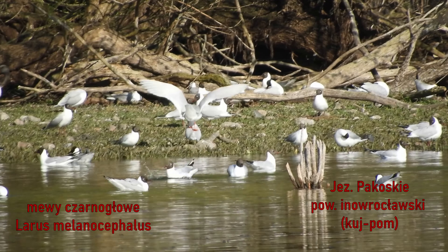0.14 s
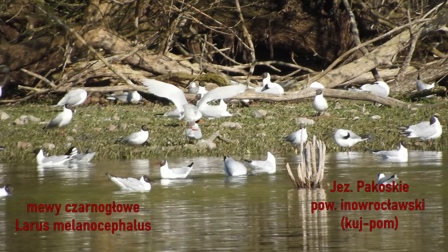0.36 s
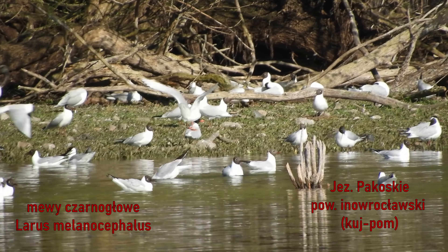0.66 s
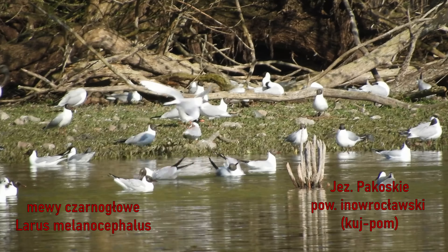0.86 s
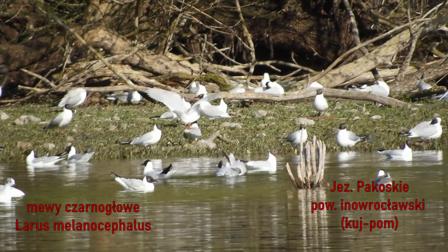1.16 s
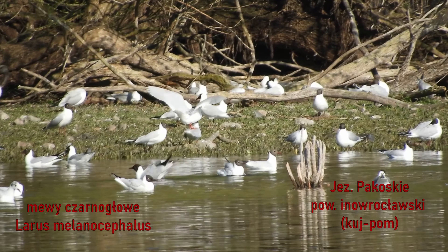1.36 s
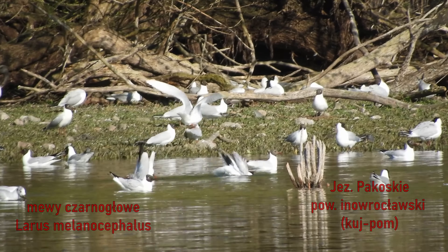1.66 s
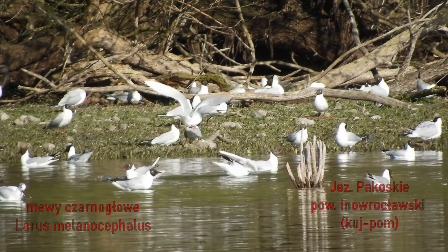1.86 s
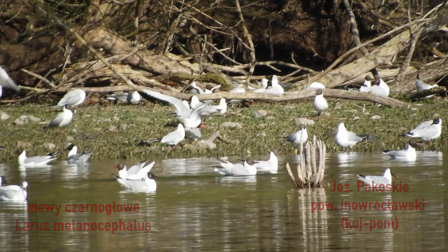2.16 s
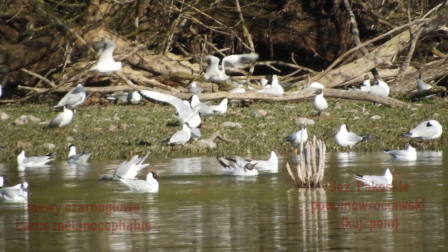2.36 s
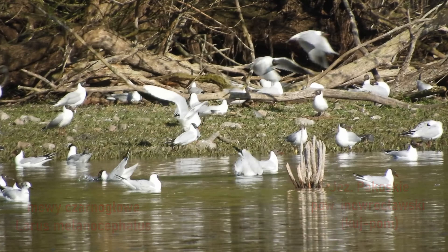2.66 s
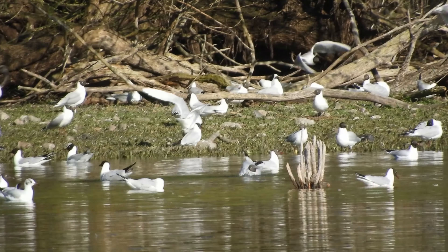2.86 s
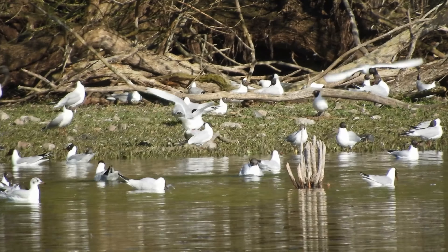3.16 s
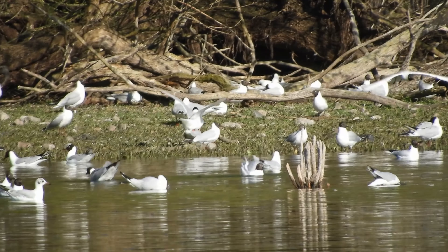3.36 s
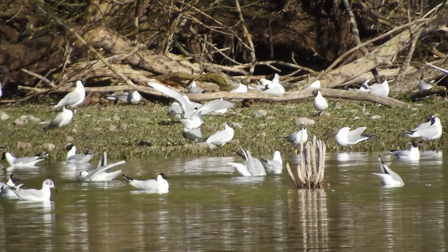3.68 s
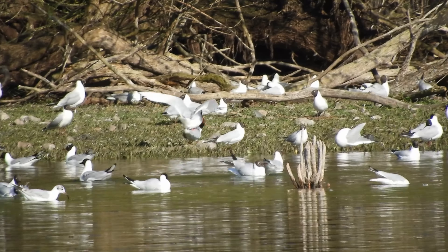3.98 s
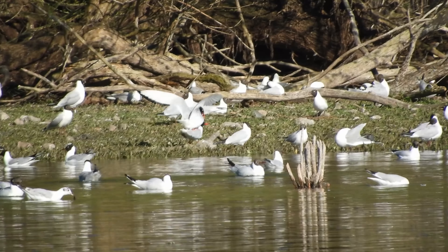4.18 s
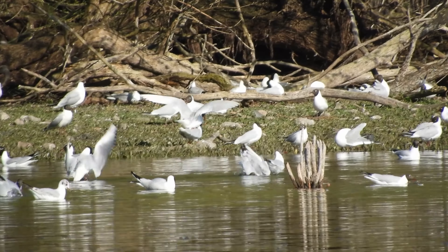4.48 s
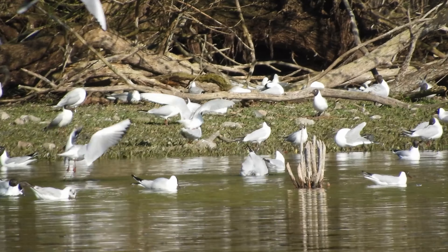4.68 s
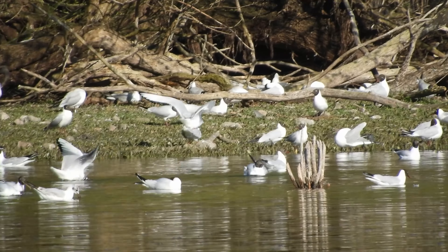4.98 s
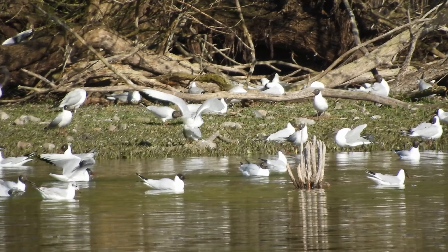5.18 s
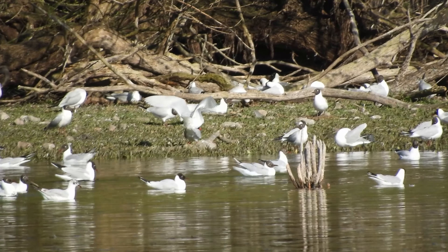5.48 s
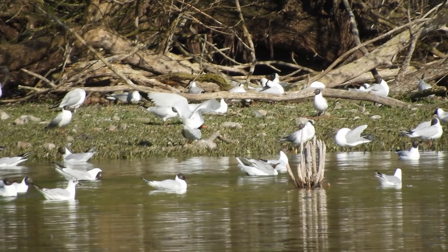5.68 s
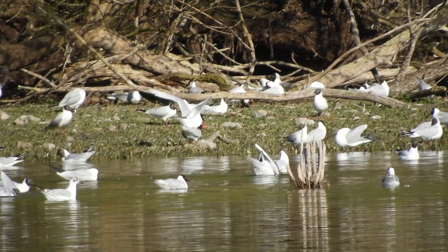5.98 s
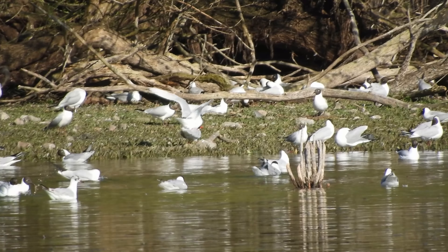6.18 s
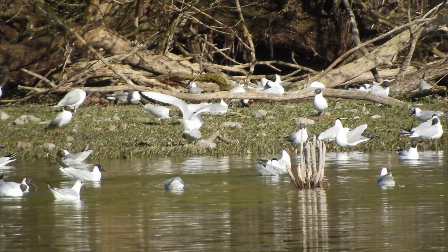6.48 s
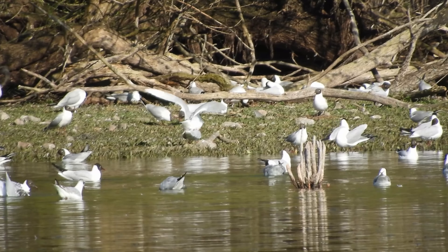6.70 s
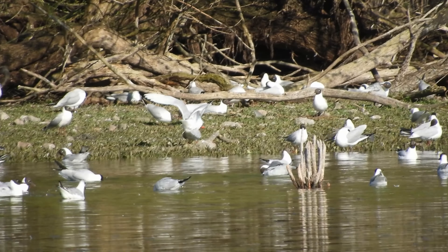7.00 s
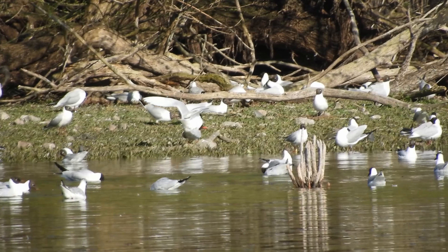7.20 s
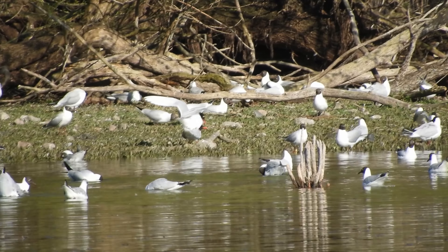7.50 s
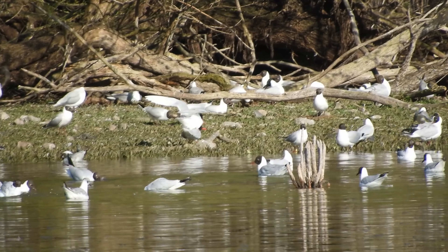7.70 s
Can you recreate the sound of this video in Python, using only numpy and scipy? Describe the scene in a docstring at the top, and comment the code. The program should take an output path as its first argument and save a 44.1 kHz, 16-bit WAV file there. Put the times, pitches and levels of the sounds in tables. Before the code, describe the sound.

Hundreds of gulls cry at once across open water, blurring into a steady nasal clamour with a loud midrange and softened highs. Individual cries, about a fifth of a second long, scoop up then sag, some clean, others hoarse. Brief high chips and three thin pips are nearly buried. A faint low hum appears only at the start, over light rumble and hiss. Sound is on the left side only, with a soft woodland echo.

```python
"""A lake shore with a gull colony, heard across the water on the left channel only; the right is silent.
Hundreds of arching pulse-train cries and a noise wash make the chorus, in three registers that swell.
Harmonic cries of nearer gulls stand out, and noise tails give the echo of the wood behind.
Gliding sines make a songbird's chips and a waterbird's pips; wavering sines make a faint drone and
a low hum that stops early, over a distant rumble and hiss of filtered noise."""
import sys
import numpy as np
from scipy import signal
from scipy.fft import rfft, irfft, next_fast_len
from scipy.io import wavfile
from scipy.ndimage import uniform_filter1d

SR = 44100
rng = np.random.default_rng(int(sys.argv[2]) if len(sys.argv) > 2 else 0)


def file_out(sig):
    """Save sig as 16-bit WAV at sys.argv[1]."""
    # one column per channel
    cols = np.atleast_2d(sig).T
    # limit, then scale
    lim = np.clip(cols, -1, 1)
    pcm = np.round(lim * 32767).astype(np.int16)
    wavfile.write(sys.argv[1], SR, pcm)


N = 346185
TIME = np.arange(N) / SR

# Levels below are those ahead of the preamp; levels of cries, chips and pips are also ahead of their fades.
# Swell of the far chorus's screaming, of which only the departures from the mean count: [t/s, level/dB]
SCREAMING_SWELL = [(0.0, -35.5), (0.13, -35.5), (0.83, -36.5), (0.85, -37.5), (1.9, -34), (3.06, -36),
                   (3.32, -30.5), (3.59, -40.5), (3.78, -34), (4.81, -35), (5.46, -38), (5.77, -33.5),
                   (6.41, -37.5), (6.58, -32.5), (7.04, -36.5), (7.85, -34)]
# Extra level of the chorus's harsh overtones: [t/s, level/dB]
OVERTONE_LIFT = [(0, 0.5), (1.5, -1.7), (2.6, -2), (3.3, 0.5), (4.2, 0), (5.0, 4), (5.9, 2), (6.15, -1),
                 (6.6, 2), (7.85, -0.1)]
# Borders between the chorus registers: [lower f/Hz, upper f/Hz]
REGISTER_BORDERS = (1350, 2600)
# Chorus registers, in rows: low mewing, open-beaked screaming, harsh overtones
# [mean level/dB, share of the screaming's swell followed, own slow drift/dB]
CHORUS_REGISTERS = [(-41, 0.34, 1), (-37, .9, 0.76), (-58, .6, .3)]
DRIFT_HZ = 2.8
# Tone colour of the gulls' voice after its way over the water: [f/Hz, gain/dB]
VOICE_OVER_WATER = [(300, -45.5), (420, -29.5), (540, -13.5), (680, -8), (1000, -4.5), (1400, -1),
                    (1800, 2.5), (2050, -1.5), (2500, -14.5), (3000, -26.5), (4000, -32.5), (4700, -40),
                    (5500, -43.5), (7000, -57)]

# Nearer gulls, one row a cry or a strong overtone of one; f is that of the row's loudest harmonic at the crest
# [start t/s, length t/s, crest f/Hz, level/dB, rasp 0-1]
NEAR_VOICES = [(0.073, 0.22, 2170, -39.5, .25), (0.075, 0.2, 3230, -57.5, 0.5),
               (0.247, 0.21, 1790, -39, 0.19), (0.421, .16, 2240, -44.5, 0.4),
               (0.579, 0.2, 2102, -40, 0.37), (0.728, 0.2, 1680, -40.5, 0.34),
               (0.777, 0.23, 3800, -60.5, .4), (1.692, 0.055, 2320, -43, .9),
               (1.838, .055, 2330, -45.5, .9), (1.861, 0.26, 1798, -41.5, 0.17),
               (1.862, 0.21, 3820, -62, 0.6), (2.238, 0.21, 1833, -42, 0.18), (2.72, 0.22, 1173, -40, 0.4),
               (2.806, 0.2, 3860, -60.5, 0.47), (2.919, .26, 2102, -41, 0.43), (3.22, 0.23, 1822, -37, 0.6),
               (3.489, 0.18, 1628, -45, 0.17), (3.72, 0.21, 2033, -36, 0.44), (3.77, 0.037, 3170, -50, 0.3),
               (3.815, 0.18, 2550, -49, 0.4), (3.801, 0.14, 3770, -62.5, .4),
               (4.142, 0.11, 1898, -33.5, 0.15), (4.448, 0.16, 2133, -37, 0.79),
               (4.66, 0.19, 2106, -39, 0.3), (5.11, 0.23, 2273, -44, 0.3), (5.31, 0.16, 3020, -52, 0.72),
               (5.621, 0.2, 1090, -43, 0), (5.83, 0.1, 994, -38, 0.15), (6.017, 0.051, 1035, -38.5, 0),
               (6.12, 0.16, 1842, -42.5, 0.05), (6.297, 0.22, 4150, -60.5, .6),
               (6.519, 0.24, 1992, -39.5, 0.68), (6.667, .15, 3090, -56, 0.63),
               (6.76, 0.17, 1873, -42.5, 0.3), (7.154, 0.21, 3840, -61, 0.54),
               (7.212, 0.18, 2640, -51.5, .2), (7.562, 0.2, 3200, -52.5, 0.67)]
# Every row scoops up to a crest and sags; the longer it lasts, the wider the arch
CREST_SHARE = .4  # of the length
SCOOP_OCTAVES_PER_S, SAG_OCTAVES_PER_S = 1.7, 1.25  # average slopes

# Songbird chips, swept up or down: [start t/s, length t/s, start f/Hz, end f/Hz, level/dB]
SONGBIRD_CHIPS = [(2.654, .05, 5550, 7500, -64.5), (2.89, .045, 5300, 6250, -70),
                  (3.65, .024, 5100, 6700, -60), (4.058, .019, 6240, 5400, -66),
                  (4.691, .034, 6300, 5150, -59), (5.06, .056, 6550, 5480, -55)]
# A rising chip sweeps evenly, a falling one levels off: share of the sweep above its low note at half time
CHIP_RISING_MIDWAY, CHIP_FALLING_MIDWAY = .5, .15
# Waterbird pips, all the same rising note: [start t/s, level/dB]
WATERBIRD_PIPS = [(3.51, -53.5), (4.24, -53.5), (4.945, -50.5)]
# Glide of a pip: [start f/Hz, middle f/Hz, end f/Hz]
PIP_GLIDE = (3270, 3550, 3560)
PIP_S = .065

# Low hum in three spells: [start t/s, length t/s, level/dB]
HUM_SPELLS = [(-.05, 0.63, -59), (.67, 0.16, -56.5), (1.04, 0.19, -55.5)]
HUM_HZ, HUM_FADE_S = 69.7, .06
# Partials of the faint drone: [f/Hz, level/dB]
DRONE_PARTIALS = [(73, -75), (97, -68), (146, -71)]
# Tone colour of the distant rumble and even hiss: [f/Hz, gain/dB]
RUMBLE_AND_HISS = [(20, -10), (45, -1), (95, -1), (150, -4), (220, -8), (380, -9.5), (1000, -16),
                   (4000, -29.5), (8000, -34), (15500, -34.5)]
RUMBLE_AND_HISS_DB = -59.5  # rms

TOP_HZ = 15750  # upper limit of the sound


def chorus(wash_db=-6, wash_corner_hz=1300, count=2):
    """Far flocks, each with its own echo, and a wash of noise; three registers swell by their own shares."""
    flocks = sum(wood(far_gulls(), t60_s=.63, wet_db=-5) for _ in range(count))
    # the farthest birds merge into a wash, of which mostly the low register carries
    wash = shape(rng.standard_normal(N), lambda f: 1 / np.hypot(1, f / wash_corner_hz))
    crowd = level(flocks, 0) + level(wash, wash_db)

    below_lower, below_upper = (shape(crowd, lambda f: 1 / (1 + (f / hz) ** 20)) for hz in REGISTER_BORDERS)
    registers = (below_lower, below_upper - below_lower, crowd - below_upper)

    screaming = np.interp(TIME, *np.transpose(SCREAMING_SWELL))
    surge = screaming - screaming.mean()
    lifts = (0, 0, np.interp(TIME, *np.transpose(OVERTONE_LIFT)))
    out = np.zeros(N)
    for register, (mean_db, follows, drift_db), lift in zip(registers, CHORUS_REGISTERS, lifts):
        part = colour(register, VOICE_OVER_WATER)
        # even out the quarter-second loudness, then ride the level
        strength = np.sqrt(uniform_filter1d(part ** 2, size=SR // 4))
        ride_db = mean_db + follows * surge + lift + drift_db * wander(DRIFT_HZ)
        out += part / strength * undb(ride_db)
    return out


def far_gulls(count=260, low_hz=430, high_hz=950, shortest_s=.1, longest_s=.34, bend=.22,
              jitter=.0503, flutter=.49, spread_db=6):
    """Cries at random times: trains of syrinx pulses, each with its own pitch arch, rasp and distance."""
    out, shake, throb = np.zeros(N), wander(124), wander(130)
    for i, (when, size, span, crest, rasp, far, place, lean) in enumerate(rng.random((count, 8))):
        length = shortest_s + span * (longest_s - shortest_s)
        top = low_hz * (high_hz / low_hz) ** size
        unsteady, beat = excerpt(shake, place, length), excerpt(throb, place, length)
        u = np.linspace(0, 1, len(beat))
        pitch = arch(u, .2 + .35 * crest, top * (1 - bend * lean), top, top * (1 - bend))
        half_phase = np.pi * np.cumsum(pitch * (1 + jitter * rasp * unsteady)) / SR
        pulses = np.sin(23 * half_phase) / np.sin(half_phase) - 1  # eleven equal harmonics
        loudness = (1 + np.tanh(flutter * rasp * beat)) * swell(u, .19) * undb(-spread_db * far)
        # one cry in each equal slot of time, at a random moment within it
        start = (i + when) / count * (N / SR + longest_s) - longest_s
        add(out, start, pulses * loudness)
    return out


def near_gulls():
    """The birds that stand out of the chorus: cries and strong overtones, all arched by the same rule."""
    start, length, top, db, rasp = np.transpose(NEAR_VOICES)
    rise = CREST_SHARE * length
    first = top * 2 ** (-SCOOP_OCTAVES_PER_S * rise)
    last = top * 2 ** (-SAG_OCTAVES_PER_S * (length - rise))
    rows = np.transpose([start, rise, length, first, top, last, db, rasp])
    return cries(rows, jitter=.034, flutter=1.2, above_db=-18.5, below_db=-14, harsh_db=7, edge=.25)


def bank_gulls(count=130, low_hz=900, high_hz=5700, shortest_s=.11, longest_s=.24, bend=.15,
               loud_db=-40, spread_db=4):
    """Birds further along the bank cry at random; pitch sets how much of the lifted harmonic arrives."""
    when, size, span, crest, rasp, far, lean = rng.random((count, 7)).T
    start = (np.arange(count) + when) / count * N / SR - longest_s / 2
    length = shortest_s + span * (longest_s - shortest_s)
    rise = length * (.1964 + .323 * crest)
    top = low_hz * (high_hz / low_hz) ** size
    dullness = .78  # share of the far chorus's tone colour
    db = loud_db + dullness * np.interp(top, *np.transpose(VOICE_OVER_WATER)) - spread_db * far
    first, last = top * (1 - bend * lean), top * (1 - bend)
    rows = np.transpose([start, rise, length, first, top, last, db, .5 * rasp])
    return cries(rows, jitter=.0427, flutter=1, above_db=-15.5, below_db=-14.5, harsh_db=8, edge=.38)


def cries(rows, jitter, flutter, above_db, below_db, harsh_db, edge, quaver=.0054,
          beak_hz=5400, beak_width_hz=600, beak_db=6):
    """Harmonic voices; the throat lifts one harmonic, and rasp shakes both pitch and loudness."""
    typical_pitch_hz = 580  # decides which harmonic is the lifted one
    out, shake, throb, wobble = np.zeros(N), wander(126), wander(200), wander(23.3)
    k = np.arange(1, 13)[:, None]  # harmonic numbers
    for (start, rise, length, first, top, last, db, rasp), place in zip(rows, rng.random(len(rows))):
        unsteady, beat, slow = (excerpt(chance, place, length) for chance in (shake, throb, wobble))
        u = np.linspace(0, 1, len(beat))
        loudest = round(top / typical_pitch_hz)
        pitch = arch(u, rise / length, first, top, last) / loudest
        hoarse = np.hypot(rasp, .3)  # no gull's voice is quite clean
        phase = 2 * np.pi * np.cumsum(pitch * (1 + jitter * hoarse * unsteady + quaver * slow)) / SR
        # harsh voices keep more of their upper harmonics, and the open beak rings high up
        slope_db = np.where(k > loudest, above_db + harsh_db * rasp, below_db)
        throat = slope_db * np.abs(k - loudest) ** .65
        beak = beak_db * np.exp(-((k * top / loudest - beak_hz) / beak_width_hz) ** 2)
        harmonics = (undb(throat + beak) * np.sin(k * phase)).sum(axis=0)
        voice = harmonics * (1 + np.tanh(flutter * hoarse * beat))
        add(out, start, level(voice, db) * swell(u, edge))
    return out


def arch(u, crest, first_hz, top_hz, last_hz):
    """Pitch of a cry: it climbs to a rounded crest and sinks as the pressure fades."""
    crest = np.clip(crest, .05, .95)
    rise = np.maximum(1 - u / crest, 0)
    fall = np.maximum((u - crest) / (1 - crest), 0)
    return top_hz + (first_hz - top_hz) * rise ** 2 + (last_hz - top_hz) * fall * np.sqrt(fall)


def songbird():
    """Short chips, each a fast sweep of a nearly pure tone."""
    notes = []
    for start, length, first, last, db in SONGBIRD_CHIPS:
        midway = CHIP_RISING_MIDWAY if last > first else CHIP_FALLING_MIDWAY
        middle = min(first, last) + midway * abs(last - first)
        notes.append((start, length, first, middle, last, db))
    return glides(notes)


def waterbird():
    """Piped notes, nearly pure, that rise and then level off."""
    return glides([(start, PIP_S, *PIP_GLIDE, db) for start, db in WATERBIRD_PIPS])


def glides(notes, waver=.011, edge=.4):
    """Sines whose pitch follows a parabola through three notes, with a fast waver."""
    out, shake = np.zeros(N), wander(250)
    for start, length, first, middle, last, db in notes:
        unsteady = excerpt(shake, start * SR / N, length)
        u = np.linspace(0, 1, len(unsteady))
        parabola = np.polyfit([0, .5, 1], [first, middle, last], 2)
        hz = np.polyval(parabola, u) * (1 + waver * unsteady)
        tone = np.sin(2 * np.pi * np.cumsum(hz) / SR)
        add(out, start, level(tone, db) * swell(u, edge))
    return out


def wood(x, t60_s, wet_db, buildup_s=.046):
    """Trunks and bank scatter a diffuse, fading echo: noise that builds up and decays."""
    t = TIME[:2 * SR]
    decay = np.exp(-np.log(1000) * t / t60_s)
    tail = rng.standard_normal(len(t)) * decay * np.minimum(t / buildup_s, 1)
    return x + undb(wet_db) * signal.fftconvolve(x, tail / np.linalg.norm(tail))[:N]


def hum():
    """A wavering low tone that sounds in faded spells and then stops."""
    spells = sum(undb(db) * swell((TIME - start) / length, HUM_FADE_S / length)
                 for start, length, db in HUM_SPELLS)
    return low_tone(HUM_HZ) * spells


def drone():
    """Faint low tones that never stop, each drifting in pitch and level."""
    return sum(low_tone(hz) * undb(db + 1.5 * wander(3.6)) for hz, db in DRONE_PARTIALS)


def low_tone(hz, drift=.015):
    """A sine of rms 1 whose pitch wavers."""
    return level(np.sin(2 * np.pi * np.cumsum(hz * (1 + drift * wander(5.2))) / SR), 0)


def rumble_and_hiss():
    """Steady noise, strongest in the bass, with a thin even hiss on top."""
    return level(colour(rng.standard_normal(N), RUMBLE_AND_HISS), RUMBLE_AND_HISS_DB)


def undb(db):
    """Decibels to gain."""
    return 10 ** (np.asarray(db) / 20)


def level(x, db):
    """Set the rms level."""
    return x * undb(db) / np.sqrt(np.mean(x ** 2))


def shape(x, gain_at):
    """Filter by a gain that is a function of frequency."""
    size = next_fast_len(len(x) + 4096)
    hz = np.maximum(np.fft.rfftfreq(size, 1 / SR), 1)
    return irfft(rfft(x, size) * gain_at(hz), size)[:len(x)]


def colour(x, points):
    """Filter by a curve of f/Hz and gain/dB points, joined over log frequency."""
    hz, db = np.transpose(points)
    return shape(x, lambda f: undb(np.interp(np.log(f), np.log(hz), db)))


def wander(rate_hz):
    """Smooth chance of rms 1 that changes about rate_hz times a second."""
    return level(shape(rng.standard_normal(N), lambda f: 1 / (1 + (f / rate_hz) ** 2)), 0)


def excerpt(x, place, length):
    """A stretch of x, length seconds long, from a place between 0 and 1."""
    size = int(max(length, .01) * SR)
    first = int(place * (N - size))
    return x[first:first + size]


def swell(u, edge):
    """Loudness over a note (u from 0 to 1): rounded onset and release."""
    return np.sin(np.pi / 2 * np.clip(np.minimum(u, 1 - u) / edge, 0, 1))


def add(out, start, sound):
    """Mix a sound in at a time in seconds, cutting what falls outside."""
    i = int(start * SR)
    lo, hi = max(i, 0), min(i + len(sound), N)
    if hi > lo:
        out[lo:hi] += sound[lo - i:hi - i]


def scene(throat_low_hz=560):
    """All the birds and the shore on the left, silence on the right."""
    gulls = wood(near_gulls(), t60_s=.78, wet_db=-11) + wood(bank_gulls(), t60_s=.18, wet_db=-13)
    # so small a throat hardly radiates its lowest notes
    gulls = shape(gulls, lambda f: 1 / np.hypot(1, (throat_low_hz / f) ** 10))
    small_birds = wood(songbird() + waterbird(), t60_s=.19, wet_db=-11)
    background = hum() + drone() + rumble_and_hiss()
    return np.array([chorus() + gulls + small_birds + background, np.zeros(N)])


def record(dry, preamp_db=6):
    """The preamp lifts the sound, and a steep elliptic low-pass cuts the top."""
    low_pass = signal.ellip(10, .1, 80, TOP_HZ, fs=SR, output="sos")  # ripple/dB, stopband/dB
    return signal.sosfilt(low_pass, dry * undb(preamp_db))


dry = scene()
out = record(dry)
file_out(out)
```